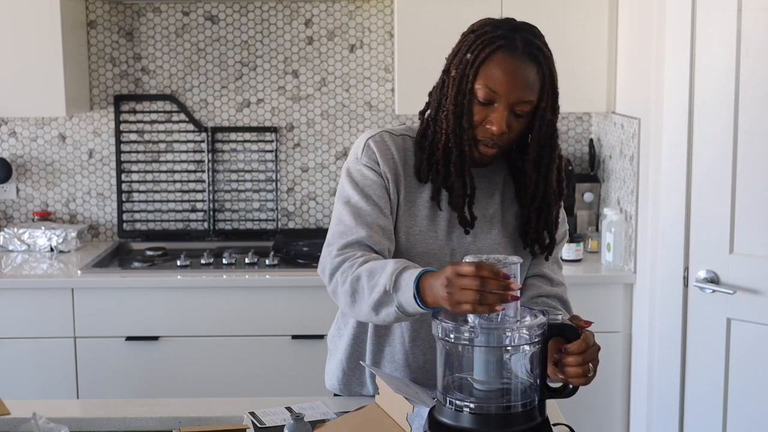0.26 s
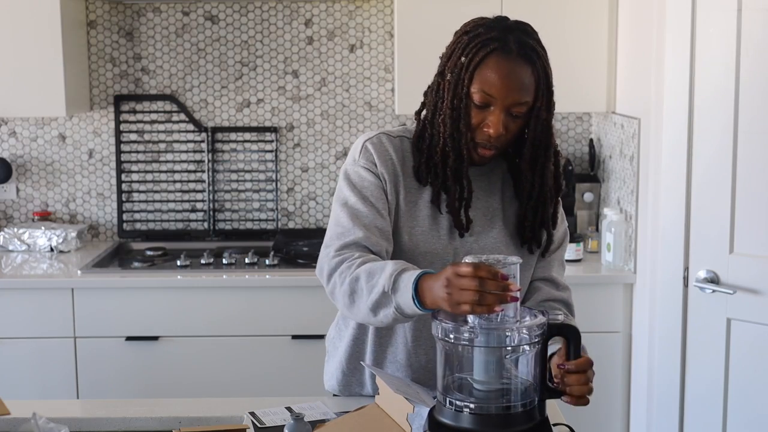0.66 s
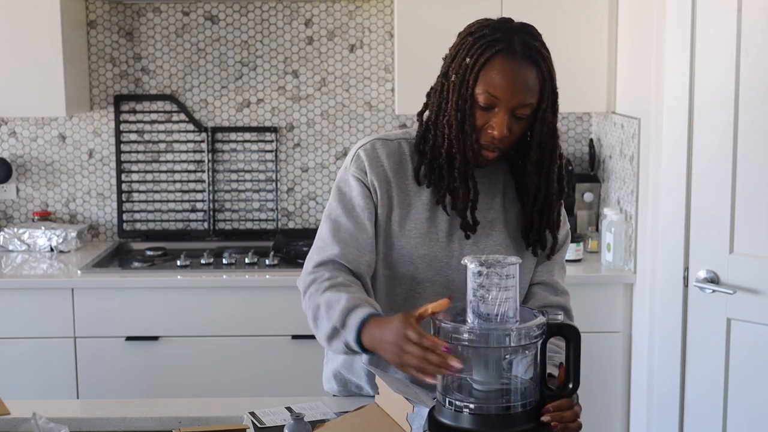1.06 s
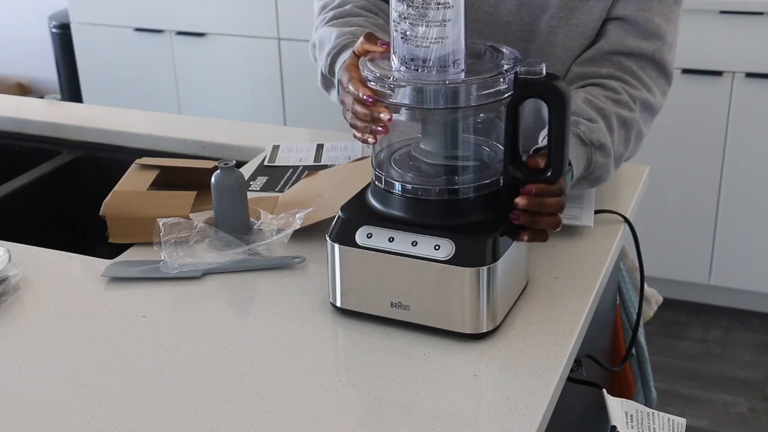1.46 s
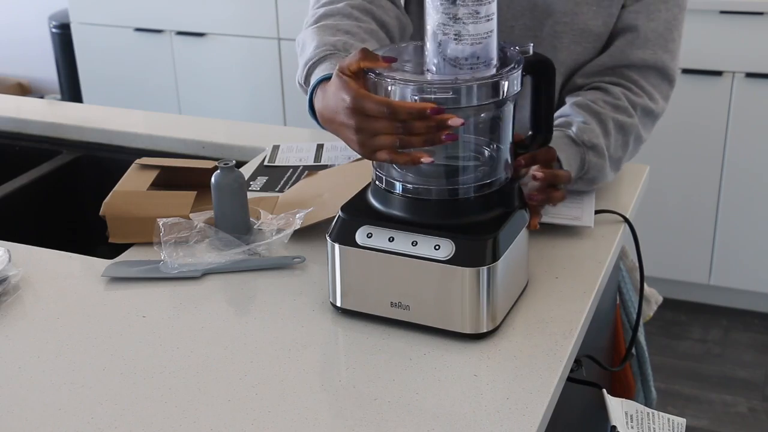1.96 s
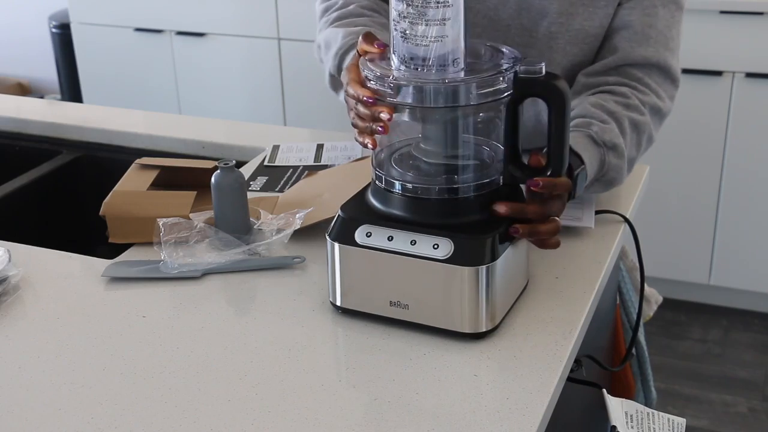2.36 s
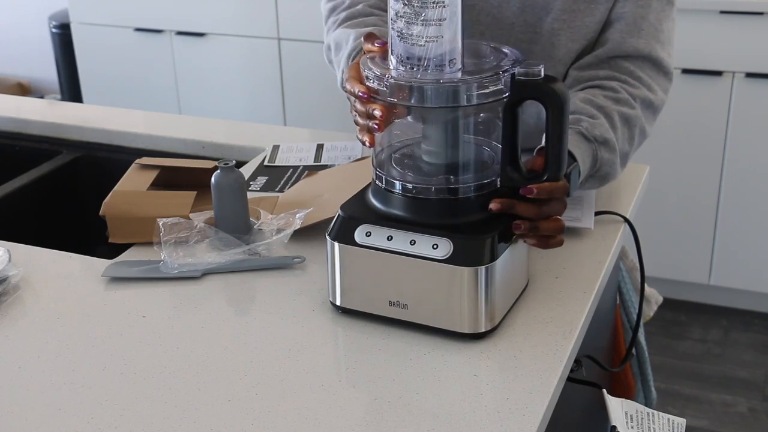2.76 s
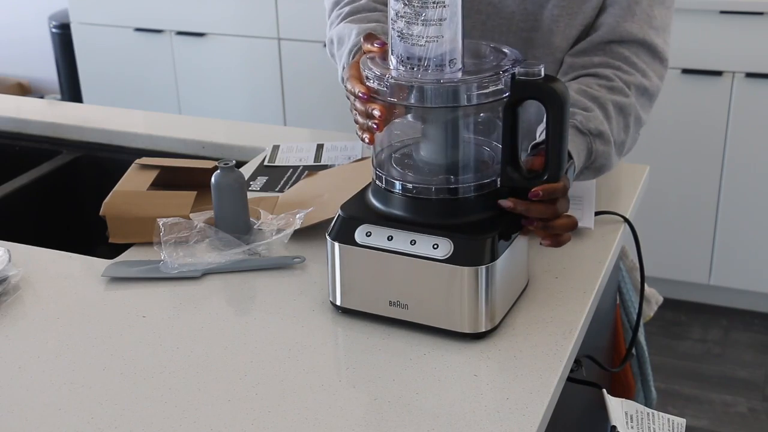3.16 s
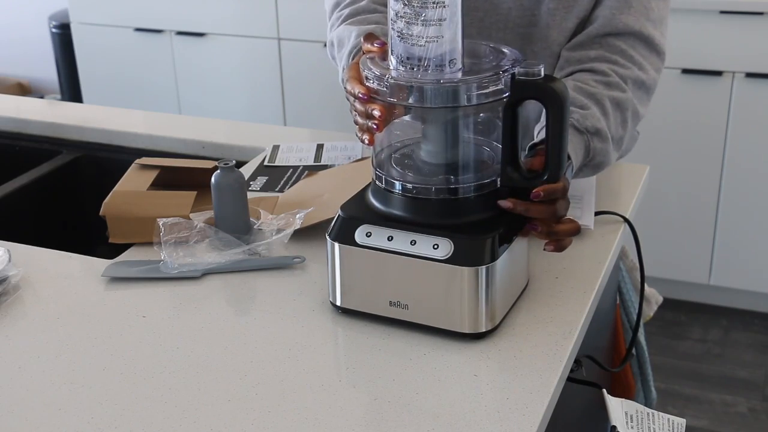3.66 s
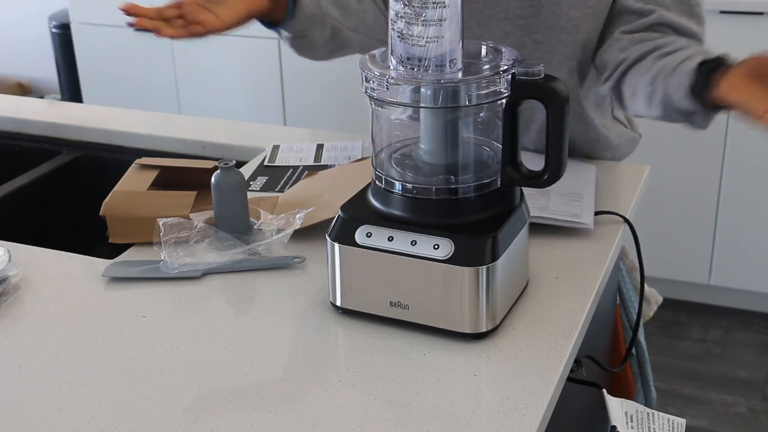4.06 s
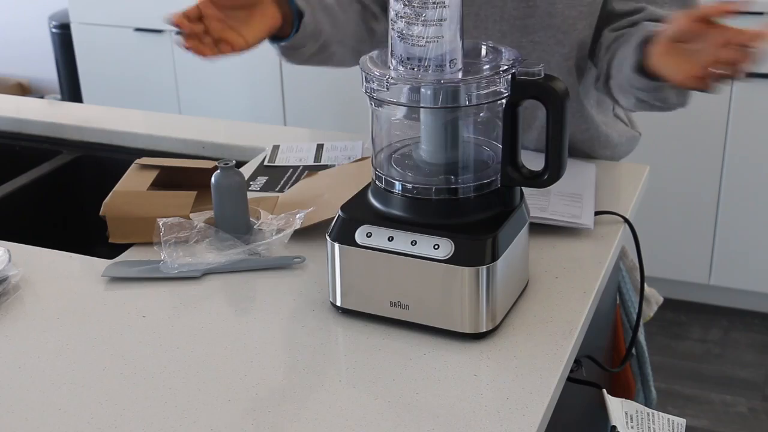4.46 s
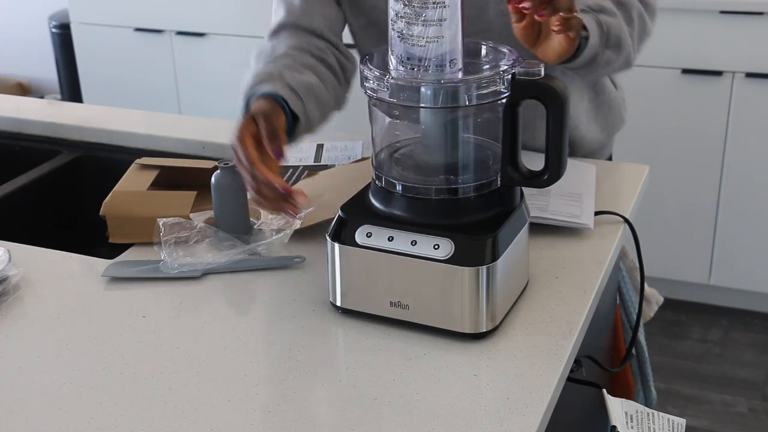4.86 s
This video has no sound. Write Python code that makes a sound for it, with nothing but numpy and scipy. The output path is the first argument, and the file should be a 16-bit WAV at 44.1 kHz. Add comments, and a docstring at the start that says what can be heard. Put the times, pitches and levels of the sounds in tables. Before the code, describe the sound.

A hard plastic clunk, faint fumbling clicks and creaks in a kitchen, then an empty kitchen motor spins up and roars steadily.

```python
"""Plastic knocks and clicks over a rustle of hands, then a food processor spins up empty in a hard kitchen.
The lid and pusher knock into place as bursts of noise ringing damped bowl modes; hands are grainy noise.
The brushed motor is a broad noise roar coloured by its casing, under a whine of rising sines.
A fridge hums far off as wavering sines in faint air noise; echoes are decaying noise."""
import sys
import numpy as np
from scipy import signal
from scipy.fft import rfft, irfft, next_fast_len
from scipy.io import wavfile
from scipy.ndimage import uniform_filter1d, minimum_filter1d

SR = 44100
rng = np.random.default_rng(int(sys.argv[2]) if len(sys.argv) > 2 else 0)


def dump_mix(stems):
    """Bounce the given channels to the path in sys.argv[1] as a 16-bit WAV at rate SR."""
    frames = np.atleast_2d(stems).T  # one column per channel
    limited = np.clip(frames, -1, 1)  # hard clip at full scale
    pcm = np.round(limited * 32767).astype(np.int16)
    wavfile.write(sys.argv[1], SR, pcm)


N = 225554   # length in samples
SIZE = next_fast_len(N + SR)   # transform length, with a second to spare for echoes
HZ = np.maximum(np.arange(SIZE // 2 + 1) * SR / SIZE, 1)
SLOT_HZ = 3683   # armature slots per second at full speed, before the slow creep


def from_db(db):
    """Decibels to an amplitude factor."""
    return 10 ** (np.asarray(db) / 20)


def rms_one(x):
    """Scale to an effective level of 1."""
    return x / np.sqrt(np.mean(x ** 2) + 1e-20)


def in_time(rows, column, outside=-120):
    """Join one column by straight lines over time, constant outside its span."""
    rows = np.array(rows)
    return np.interp(np.arange(N) / SR, rows[:, 0], rows[:, column], left=outside, right=outside)


def at_hz(points, hz):
    """Read a curve by straight lines over log frequency."""
    points = np.array(points)
    return np.interp(np.log(hz), np.log(points[:, 0]), points[:, 1])


def shaped(x, gain):
    """Apply a gain per frequency."""
    return irfft(rfft(x, SIZE) * gain, SIZE)[..., :N]


def causal(gain):
    """The same gain per frequency with minimum phase: rings come after their cause."""
    fold = irfft(np.log(gain), SIZE)
    fold[1:SIZE // 2] *= 2
    fold[SIZE // 2 + 1:] = 0
    return np.exp(rfft(fold))


def drift(rate):
    """Random wandering of spread 1, smoothed above the rate in Hz."""
    return rms_one(shaped(rng.standard_normal(N), 1 / (1 + (HZ / rate) ** 2)))


def peak(hz, width_hz):
    """Bell of a resonance, 1 on top."""
    return 1 / (1 + (2 * (HZ - hz) / width_hz) ** 2)


def lifted(rings):
    """Gain per frequency of resonances whose dB lifts add up."""
    return from_db(sum(lift_db * peak(hz, width_hz) for hz, width_hz, lift_db in rings))


def spread(pair):
    """Mix two unrelated signals to left and right, more alike in the bass than in the treble."""
    # Left-right likeness of diffuse sound. Each row: frequency in Hz, likeness from 0 to 1.
    likeness = [(60, .99), (250, 0.99), (500, 0.99), (1000, 0.92), (2000, 0.72), (4000, 0.62), (9000, 0.7)]
    alike = at_hz(likeness, HZ)
    middle = shaped(pair[0], np.sqrt((1 + alike) / 2))
    side = shaped(pair[1], np.sqrt((1 - alike) / 2))
    return middle + side * [[1], [-1]]


def background():
    """Steady room air noise, and the fridge as sines that waver in level and phase."""
    # Colour of the air noise. Each row: frequency in Hz, relative level in dB.
    air_colour = [(15, -61), (25, -23), (108, 0.5), (167, -6), (227, -2.5), (286, -25), (351, 3.5),
                  (602, -12), (777, -6.5), (1030, -13), (4450, -19.5), (8450, -30.5), (11500, -40),
                  (14900, -72.5), (22000, -120)]
    # Fridge hum. Each row: frequency in Hz, waver rate in Hz, typical effective level in dB.
    fridge_hum = [(56.5, 2.5, -66), (118, 1.3, -57.5), (128.5, 4.4, -59.5), (218.7, 15, -54.5),
                  (478, 13, -63.5), (770, 12, -72.5)]
    air_db = -51.5
    air = rms_one(spread(shaped(rng.standard_normal((2, N)), from_db(at_hz(air_colour, HZ)))))
    t, hum = np.arange(N) / SR, 0
    for hz, waver_hz, db in fridge_hum:
        level = from_db(db + 2 * drift(waver_hz))
        hum = hum + level * np.sin(2 * np.pi * hz * t + 0.86 * drift(waver_hz))
    return from_db(air_db) * air + np.sqrt(2) * hum   # a sine peaks at root 2 times its effective level


def hands():
    """Skin slips on plastic in uneven grains, cloth rustles, the base creaks low on the counter."""
    # Colour of the skin rub. Each row: frequency in Hz, relative level in dB.
    rub_colour = [(240, -49), (400, -30), (454, 7), (2420, -1), (4480, -14.5), (5160, -47), (7330, -41),
                  (11500, -80), (14900, -64), (22000, -120)]
    # Hand and sleeve movements. Each row: strongest moment in seconds, swell in seconds, fade in seconds,
    # then the peak levels in dB of rub, base creak and fine rustle.
    grips = [(0.055, 0.19, 0.14, -40, -44, -59), (0.122, 0.073, 0.025, -31.5, -40, -43.5),
             (0.56, 0.35, 0.22, -52, -57, -53), (0.77, 0.23, 0.08, -53.5, -47, -68),
             (0.9, 0.14, 0.099, -58, -58, -52.5), (1.19, 0.18, 0.22, -54, -50.5, -64.5),
             (1.44, 0.073, 0.41, -54.5, -53, -57.5), (1.719, 0.1, 0.18, -41.5, -38, -55),
             (1.99, 0.1, 0.17, -54.5, -50, -65), (2.31, 0.24, 0.25, -47.5, -39.5, -62),
             (2.62, 0.28, 0.1, -51, -58, -63), (2.723, 0.0078, 0.041, -39, -38, -40.5)]
    # Floor under the grips: rub, creak and rustle levels in dB.
    resting_db = (-67.5, -72, -71.5)
    grains = rng.standard_normal((2, N)) * from_db(4.2 * drift(52))
    rub = rms_one(shaped(grains[0], from_db(at_hz(rub_colour, HZ))))
    rustle = rms_one(shaped(grains[1], peak(4900, 7600)))
    creak = rms_one(shaped(rng.standard_normal(N), peak(259, 152)))
    t = np.arange(N) / SR
    gains = from_db(resting_db)[:, None] * np.ones(N)
    for s, swell, fade, *levels_db in grips:
        # swell and fade are the times for 20 dB
        shape = from_db(-20 * np.where(t < s, (s - t) / swell, (t - s) / fade))
        gains = np.maximum(gains, from_db(levels_db)[:, None] * shape)   # the strongest grip wins
    return np.sum(gains * [rub, creak, rustle], axis=0)


def knocks():
    """Each knock is a short chatter of contacts ringing the damped bowl modes; returns direct and wall sound.
    The walls hear it from all sides at once, so they get the even spectrum of a single contact."""
    # Plastic knocks and clicks. Each row: start in seconds, level of the 1-2 kHz modes in dB,
    # level of the low, upper and treble modes in dB against these, chatter length in seconds.
    hits = [(0.0612, -29, 8.5, -18, -18, 0.0026), (0.1132, -24, -14, -21, -26, 0.003),
            (0.1267, -16.5, -3.5, 1, -7.5, 0.0066), (0.1321, -7.5, -7, -35, -14.5, 0.0099),
            (0.2374, 3.5, -8, -6.5, -18, 0.0064), (0.9942, -31, -13, -21, -9, 0.0043),
            (1.1598, -50, -6, 8, 1, 0.0023), (1.2531, -44, -3, -10.5, -13, 0.0043),
            (1.445, -54, 0, 10, -4, 0.0029), (1.6399, -19.5, -11, 2.5, -30, 0.0031),
            (1.6432, -20, -25, -22, -34, 0.0061), (1.7416, -36, -18, -17, -10.5, 0.0037),
            (1.953, -51, -9.5, 4, 2, 0.0035), (2.0624, -56, 0, -9, 4, 0.0031),
            (2.2404, -50, 0, -4, -5, 0.0041), (2.285, -52, 1, 2, 3, 0.004),
            (2.316, -36.5, -17, -6, -28, 0.0045), (2.38, -33, -2.5, -12, -12, 0.009),
            (2.6272, -38, -16, -5, -19, 0.0035), (2.6457, -37, -10, -18, -35, 0.0045),
            (2.7345, -23, 2, 3.5, -4.5, 0.0032)]
    # Heavily damped bowl and lid modes. Each row: frequency in Hz, width in Hz, relative level in dB.
    bowl_modes = [(348, 230, 15), (443, 98, 16.5), (864, 440, 16.5), (1333, 510, 10), (1810, 740, 10),
                  (2210, 1600, -7), (2820, 670, 13), (3800, 2200, -3.5), (4820, 5800, 15.5),
                  (5820, 5000, 16), (7900, 4200, -5.5), (9800, 6900, -24)]
    size, pan_db, scatter_db = 4096, -0.5, 1.5   # samples per knock; left minus right; chance per mode
    pan = from_db(pan_db * np.array([[.5], [-.5]]))
    near, around = np.zeros((2, N + size)), np.zeros(N + size)
    t, hz = np.arange(size) / SR, np.arange(size // 2 + 1) * SR / size
    for s, level_db, low_db, upper_db, treble_db, length in hits:
        contacts = rng.standard_normal(size)
        chatter = contacts * (t / length) ** 0.73 * np.exp(-2 * t / length)
        chatter = chatter / np.sqrt(np.sum(chatter ** 2))
        body = 0
        for k, (mode_hz, width_hz, mode_db) in enumerate(bowl_modes):
            part = np.searchsorted([1000, 2000, 4300], mode_hz)
            part_db = (low_db, 0, upper_db, treble_db)[part]
            ringing = 1j * hz * width_hz / (mode_hz ** 2 - hz ** 2 + 1j * hz * width_hz)
            ringing = ringing / (1 + 1j * hz / (2 * mode_hz)) ** 2   # a soft contact adds little above the mode
            gain = from_db(mode_db + part_db + rng.normal(0, scatter_db))
            body = body + (-1) ** k * gain * ringing   # neighbours in opposite phase
        body = body * np.sqrt(SR * length) * from_db(level_db)   # a longer chatter carries more energy
        at = round(s * SR)
        near[:, at:at + size] += irfft(rfft(chatter) * body, size) * pan
        around[at:at + size] += irfft(body, size)
    return near[:, :N], around[:N]


def slot_rate():
    """Slots passing per second: the armature leaps up, settles in more slowly, then creeps on as it warms."""
    spin_from_s, creep_hz_per_s = 2.7067, 49
    leap_share, leap_s, settle_s = 0.69, 0.0894, 0.427   # share of the rise, time constants
    t = np.maximum(np.arange(N) / SR - spin_from_s, 1e-3)
    short = leap_share * np.exp(-t / leap_s) + (1 - leap_share) * np.exp(-t / settle_s)
    return SLOT_HZ * (1 - short) + creep_hz_per_s * t


def motor_roar(rate_hz, turn_phase, on, running):
    """Noise through the casing, throbbing with the shaft, louder and brighter with speed."""
    # Colour of the roar ahead of the casing. Each row: frequency in Hz, relative level in dB.
    roar_colour = [(53, -64), (90, -29), (199, -5), (298, -8), (404, -13.5), (856, -2.5), (928, -2),
                   (1360, -1.5), (1450, 2), (1740, -2.5), (2220, 0), (3200, -3.5), (6130, -15), (7500, -14),
                   (11500, -31.5), (14900, -71), (22000, -120)]
    level_db, creep_db_per_s = -16, 1.21   # at full speed on switching on; then rising
    follows, throb = 0.22, 0.14   # dB per dB of speed; depth
    dull_db_per_octave = 1.5   # spectral tilt for each octave below full speed, one octave at most
    speed = rate_hz / SLOT_HZ
    colour = from_db(at_hz(roar_colour, HZ)) * casing_gain()
    colour = colour / np.sqrt(np.mean(colour ** 2))
    white = rng.standard_normal((2, N)) * (1 + throb * np.sin(turn_phase))
    tilt, roar = dull_db_per_octave * np.clip(np.log2(speed), -1, 0), 0
    for octave in range(-4, 4):   # overlapping slices around 1.5 kHz, so that the brightness can change
        piece = np.clip(1 - abs(np.log2(HZ / 1500) - octave), 0, 1)
        roar = roar + shaped(white, colour * piece) * from_db(tilt * octave + .5 * drift(0.99))
    level = on * speed ** follows * from_db(level_db + creep_db_per_s * running)
    return level * spread(roar)


def casing_gain():
    """The casing lifts whatever passes through it at its own resonances."""
    # Casing rings. Each row: frequency in Hz, width in Hz, lift in dB.
    casing_rings = [(301, 120, 4.5), (466, 37, 6), (643, 14, 3), (830, 18, 2.5), (946.4, 25, 9),
                    (1077, 44, 5), (1449.5, 46, 5), (1650, 38, -2), (1628, 27, 6), (1873, 83, 5),
                    (2096, 21, 3), (2277, 37, 8.5), (2460, 61, 6), (2648, 25, 7), (2692, 44, 6.5),
                    (2920, 62, 6), (3107, 45, 7.5), (3340, 35, 3), (4460, 27, 5), (5090, 410, 4)]
    return lifted(casing_rings)


def motor_whine(rate_hz, slot, shaft_phase, on):
    """Sines at slot and commutator rates ring frame and casing; unbalance adds a tone once a turn."""
    # Loudness of the slot tone as it passes a pitch, ahead of the rings. Each row: pitch in Hz, level in dB.
    slot_tone = [(1000, -34), (1400, -21), (1800, -24), (2100, -25), (2450, -30), (2780, -30), (3400, -28),
                 (3520, -38), (3700, -46)]
    # The same for the commutator tone. Each row: pitch in Hz, level in dB.
    commutator_tone = [(2000, -50), (4800, -49), (5220, -27), (5600, -49), (6220, -44), (6350, -31),
                       (6630, -26), (7000, -35), (7380, -39), (7470, -40), (7600, -37)]
    # Unbalance tone. Each row: time in seconds, level in dB.
    unbalance = [(2.75, -40), (2.9, -34), (3.1, -32.5), (3.25, -36.5), (3.6, -35), (5.12, -51)]
    # Frame rings that the rising slot tone sets off in turn. Each row: frequency in Hz, width in Hz, lift in dB.
    frame_rings = [(1520, 60, 13), (1850, 60, 9), (2110, 60, 10), (2620, 60, 8)]
    casing = casing_gain()
    slot_level = from_db(at_hz(slot_tone, rate_hz) + 4 * drift(60))
    slots = slot_level * np.sin(slot + .7 * drift(90))
    commutator = from_db(at_hz(commutator_tone, 2 * rate_hz)) * np.sin(2 * slot)
    shaft = from_db(in_time(unbalance, 1) + 2 * drift(8)) * np.sin(shaft_phase)
    ringing_slots = shaped(on * slots, causal(lifted(frame_rings) * casing))
    return ringing_slots + shaped(on * commutator, causal(casing)) + shaft


def motor():
    """One turning armature drives both roar and whine, so throb and tones rise together."""
    switch_on_s, switch_rise_s, slots_per_turn = 2.731, 0.012, 12
    rate_hz, running = slot_rate(), np.arange(N) / SR - switch_on_s
    on = np.clip(running / switch_rise_s, 0, 1)
    unsteady_hz = rate_hz * (1 + 0.00181 * drift(23.3))
    slot = np.cumsum(unsteady_hz) * 2 * np.pi / SR
    shaft_phase = slot / slots_per_turn
    return motor_roar(rate_hz, shaft_phase, on, running), motor_whine(rate_hz, slot, shaft_phase, on)


def kitchen():
    """Echo response of energy 1: noise that dies band by band and thickens over the first reflections."""
    # Echo decay. Each row: frequency in Hz, time to fall 60 dB in seconds.
    decay = [(150, 0.55), (400, 0.52), (1040, 0.53), (2760, 0.43), (7280, 0.31)]
    t, edges = np.arange(SR) / SR, 60 * 2 ** np.arange(0, 8.1, .5)   # half-octave bands
    white, tail = rng.standard_normal((2, SR)), 0
    for low, high in zip(edges, edges[1:]):
        band = signal.sosfilt(signal.butter(2, [low, high], "band", fs=SR, output="sos"), white)
        t60 = at_hz(decay, np.sqrt(low * high))
        tail = tail + band * from_db(-60 * t / t60) / np.sqrt(t60)
    tail = spread(tail * np.clip((t - .004) / 0.0015, 0, 1))   # silent for 4 ms, full 1.5 ms later
    return rfft(tail / np.sqrt(np.mean(np.sum(tail ** 2, axis=1))), SIZE)


def scene():
    """Near sounds and their echoes, over the background."""
    touch_wet_db, roar_wet_db = -0.5, -6   # echo sends; the whine goes in whole
    thin_wall_hz = 188   # the small bowl radiates little below this
    touch, (knock, around), (roar, whine) = hands(), knocks(), motor()
    wet = from_db(touch_wet_db) * (around + touch) + whine + from_db(roar_wet_db) * roar.mean(axis=0)
    near = knock + touch + roar + whine + shaped(wet, kitchen())
    thin_wall = signal.butter(3, thin_wall_hz, "high", fs=SR, output="sos")
    return signal.sosfilt(thin_wall, near) + background()


def record(dry):
    """The two microphones differ a little, a fast limiter holds loud peaks down, the top is cut."""
    # Microphone difference. Each row: frequency in Hz, left minus right in dB.
    lean = [(250, 0.0), (600, -0.6), (1200, -0.5), (2200, -3), (4000, -1.3), (9000, -0.5)]
    ceiling, stop_hz = 1.25, 11985   # a little over full scale; 50 dB down from here up
    leaning = shaped(dry, from_db(at_hz(lean, HZ) * np.array([[.5], [-.5]])))
    room = ceiling / np.maximum(abs(leaning).max(axis=0), ceiling)
    gain = uniform_filter1d(minimum_filter1d(room, size=41), size=41)   # about 1 ms, both sides alike
    top_cut = signal.cheby2(16, 50, stop_hz, fs=SR, output="sos")
    return signal.sosfilt(top_cut, gain * leaning)


dry = scene()
out = record(dry)
dump_mix(out)
```